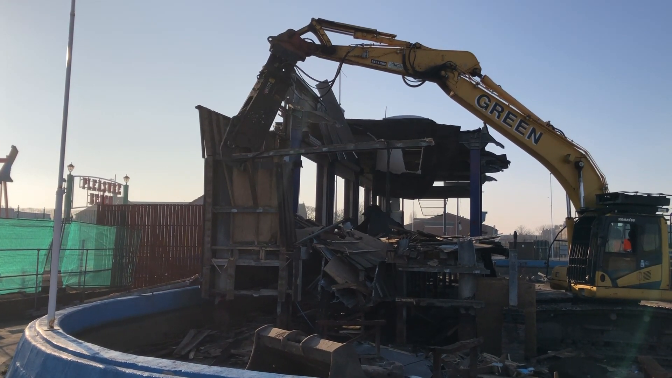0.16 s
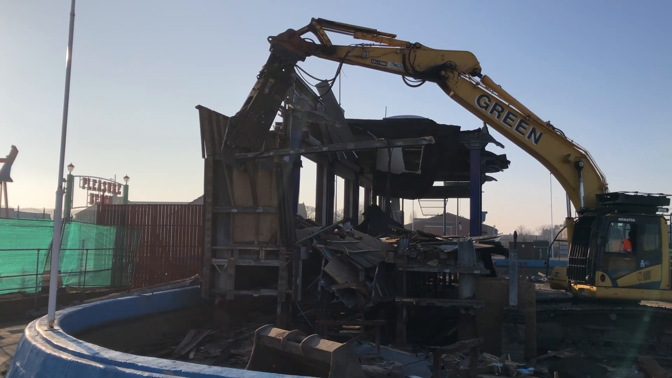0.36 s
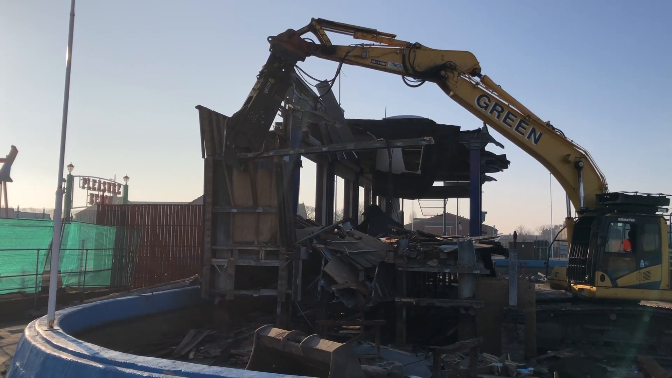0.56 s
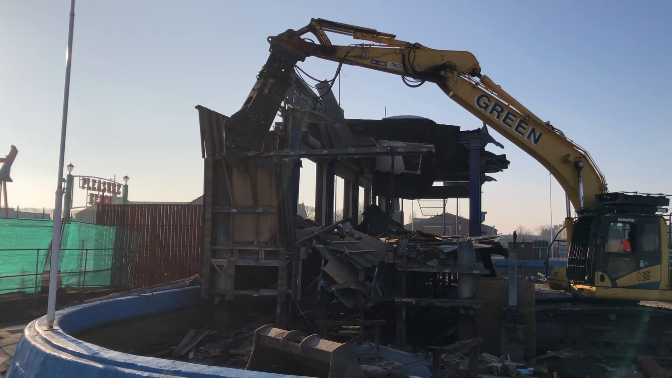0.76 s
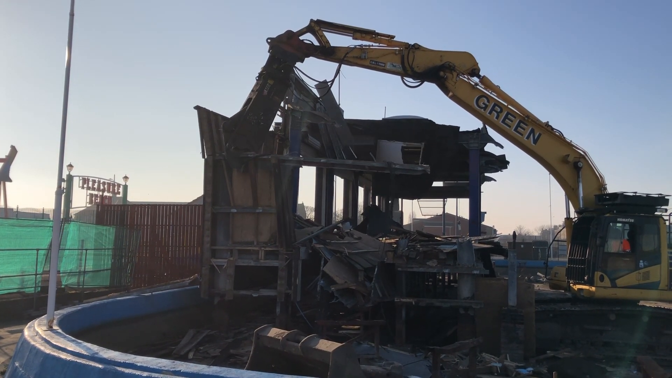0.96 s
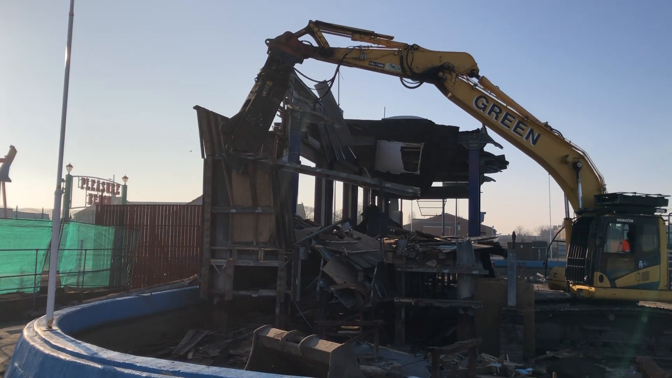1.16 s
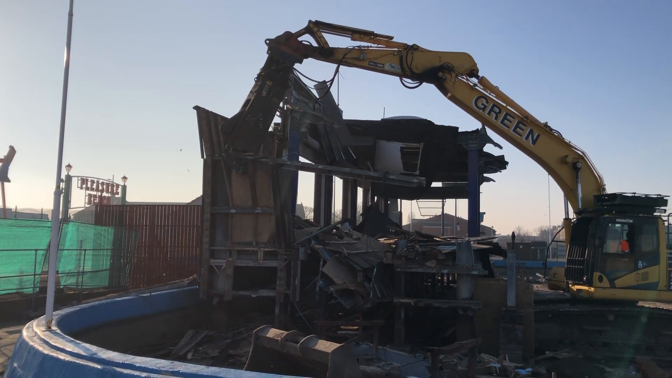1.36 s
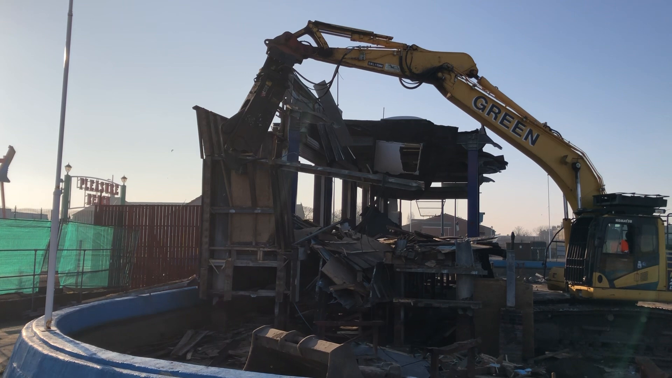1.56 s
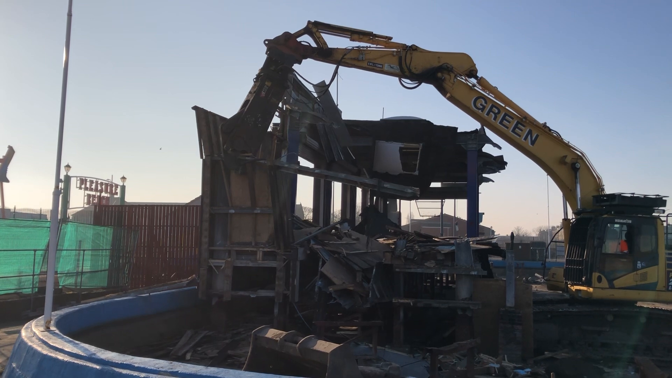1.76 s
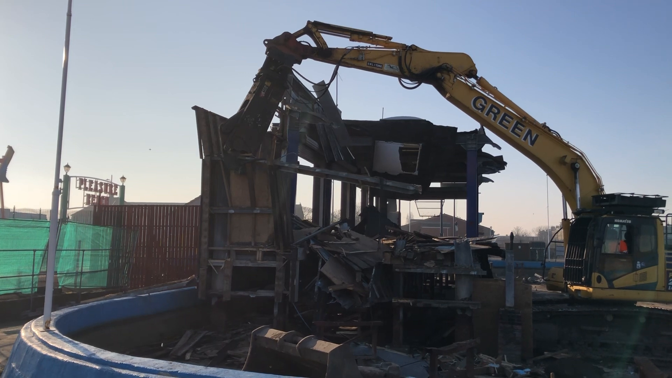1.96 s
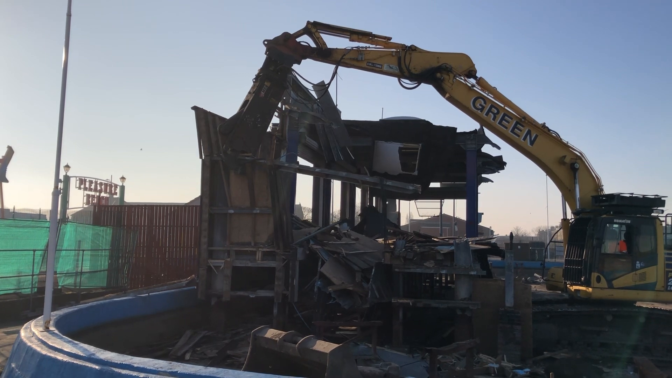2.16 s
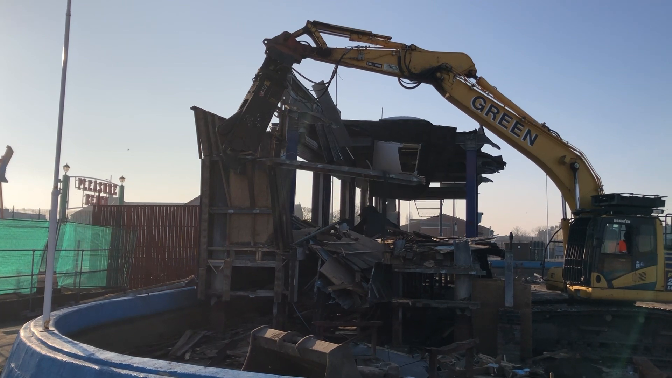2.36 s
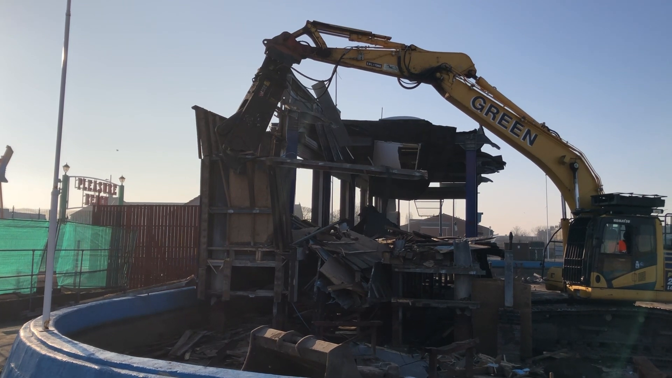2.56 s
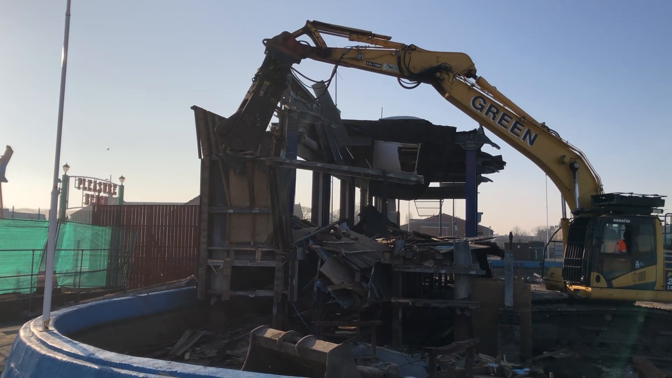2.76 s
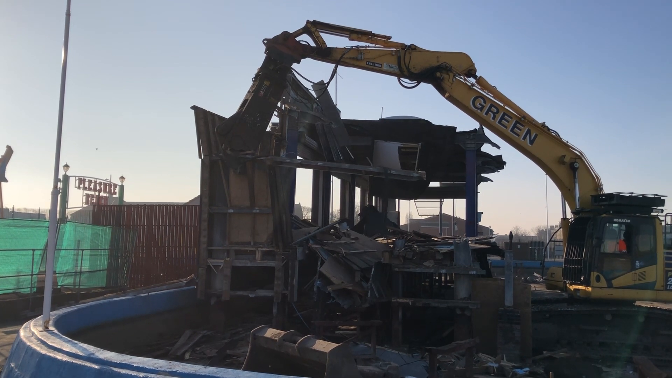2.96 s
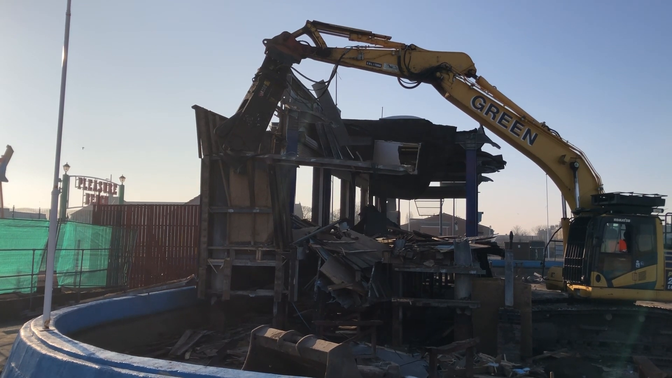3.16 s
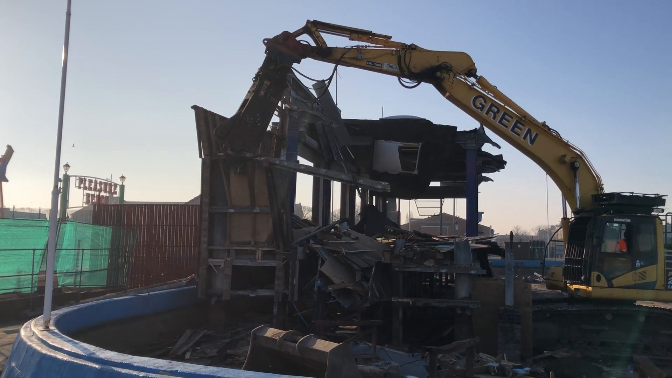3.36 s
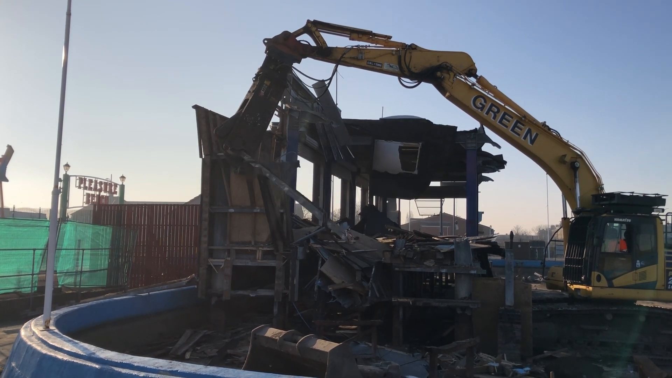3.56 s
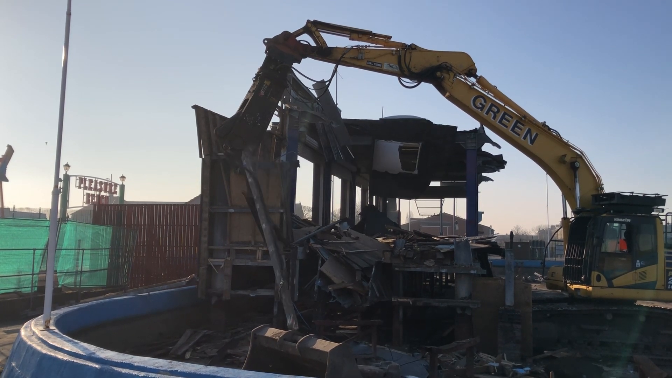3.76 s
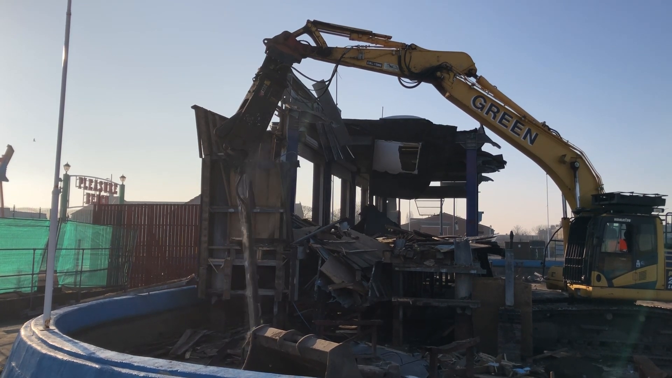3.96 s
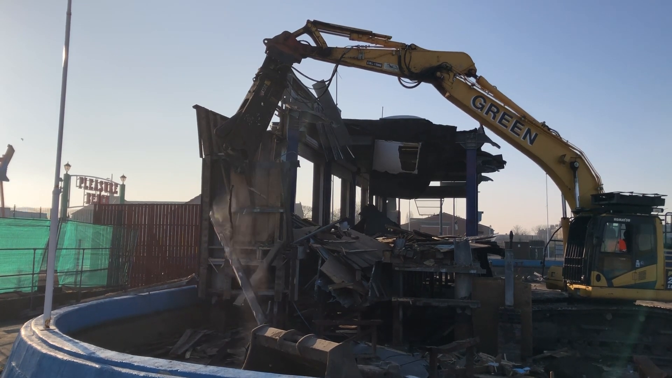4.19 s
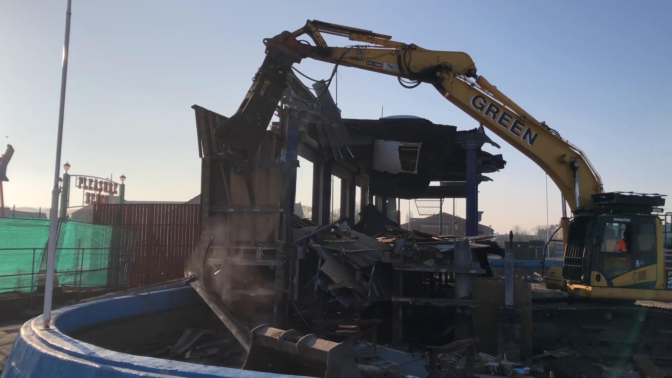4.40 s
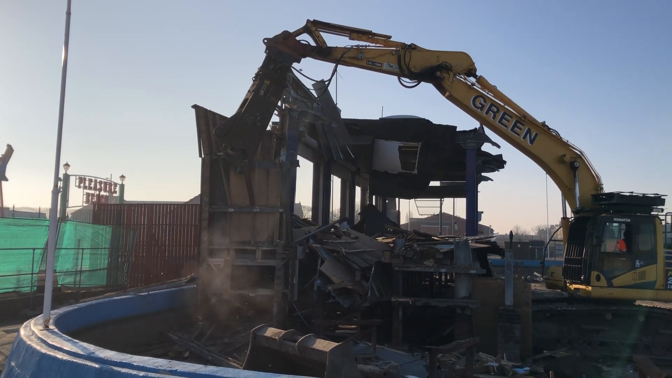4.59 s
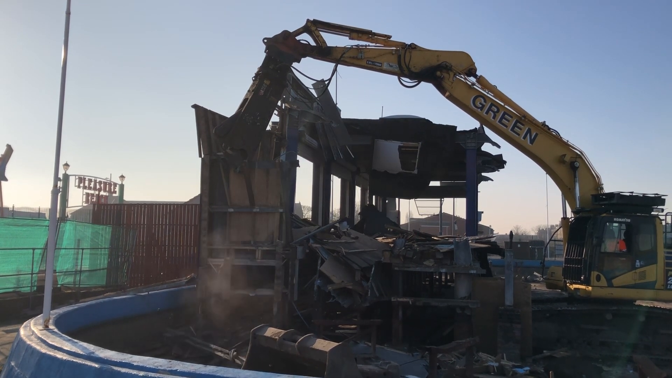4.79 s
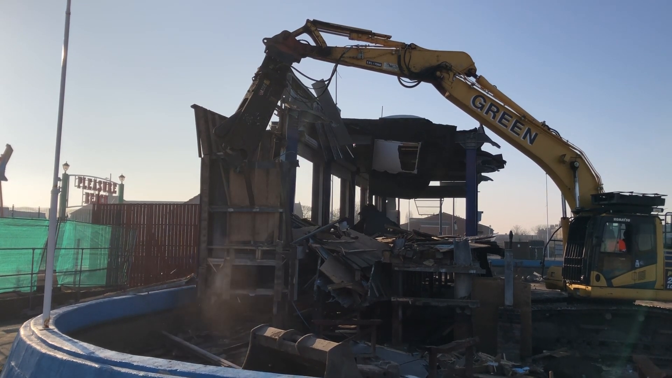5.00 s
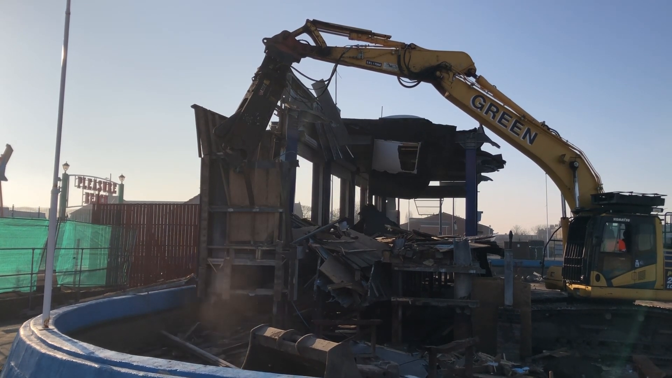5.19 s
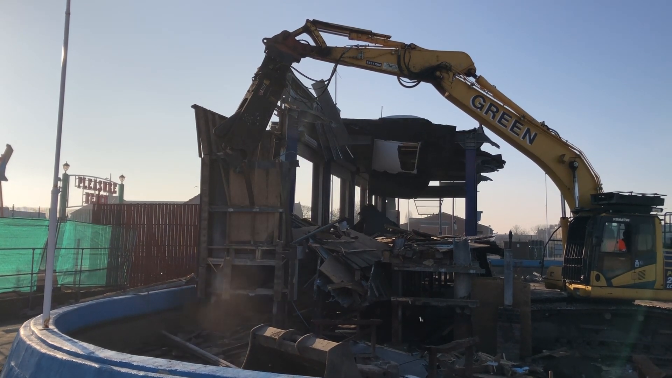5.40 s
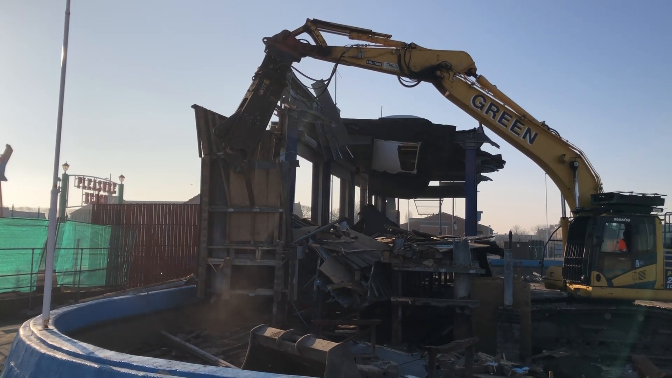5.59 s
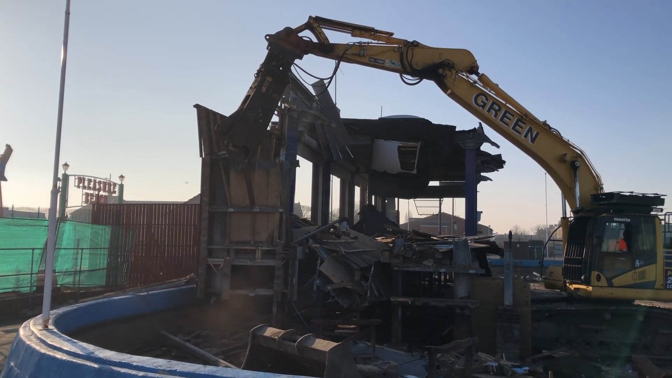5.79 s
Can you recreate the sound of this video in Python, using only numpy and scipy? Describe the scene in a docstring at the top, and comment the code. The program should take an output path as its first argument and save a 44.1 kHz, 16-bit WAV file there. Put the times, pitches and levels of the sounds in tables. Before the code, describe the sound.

Across an open demolition site, an idling excavator drones as metal snaps loudly, a beam crashes down against a wall, and debris settles.

```python
"""Grab tearing at a metal building

An excavator's grab tears at a metal building frame, heard from across the site, over diesel and pump hum.
Cladding crunches as volleys of tiny breaks filtered by resonances; chips, frame and wall ring in dying modes.
A beam lands against a wall that booms, and rubble tumbles in knocks that weaken on average.
Frequency-modulated tones make the engine, the pump and a faint electronic whine; ticks repeat throughout."""
import sys
import numpy as np
from scipy import signal
from scipy.fft import rfft, irfft, next_fast_len
from scipy.io import wavfile

SR = 44100
rng = np.random.default_rng(int(sys.argv[2]) if len(sys.argv) > 2 else 0)


def int16_out(signal):
    """Quantize to a 16-bit WAV file."""
    q = np.round(np.clip(np.atleast_2d(signal).T, -1, 1) * 32767)
    wavfile.write(sys.argv[1], SR, q.astype(np.int16))


N = 257540
TIME = np.arange(N) / SR  # s


def amp(db):
    """Logarithmic level: decibels become an amplitude ratio."""
    return 10 ** (np.asarray(db) / 20)


def unit(x):
    """Energy normalisation: scales a signal to rms 1."""
    return x / np.sqrt(np.mean(x ** 2) + 1e-20)


def read(points, hz):
    """Logarithmic pitch scale: interpolates a table along log frequency."""
    table_hz, value = np.transpose(points)
    return np.interp(np.log(hz + 1), np.log(table_hz + 1), value)


def add(mix, start_s, sound):
    """Superposition: sums a sound into the mix, in place, at a given time."""
    part = mix[max(round(start_s * SR), 0):][:len(sound)]
    part += sound[:len(part)]


def noise(spectrum):
    """Spectral shaping: white noise weighted to a given colour, at rms 1."""
    size = next_fast_len(N)
    white = rfft(rng.standard_normal(size))
    gain = amp(read(spectrum, np.fft.rfftfreq(size, 1 / SR)))
    return unit(irfft(white * gain, size)[:N])


def drift(per_s):
    """Slow random modulation: straight lines between per_s random values a second, at rms 1."""
    knots = rng.standard_normal(4096)
    return unit(np.interp(TIME * per_s, np.arange(len(knots)), knots))


def click(spectrum, peak_hz=1000, peak_db=0, octaves=0.19, size=4096):
    """Minimum phase: the causal impulse response of a given spectrum with one resonance on top."""
    hz = abs(np.fft.fftfreq(size, 1 / SR))
    distance = np.log2((hz + 1) / peak_hz) / octaves
    db = read(spectrum, hz) + peak_db / (1 + distance ** 2)
    log_gain = np.log(amp(np.maximum(db, -100)))
    # the Hilbert transform of the log gain supplies the minimum phase
    response = np.exp(np.conj(signal.hilbert(log_gain)))
    return np.fft.ifft(response).real[:size // 2]


def ring(modes, lift_db=0):
    """Modal decay: damped sines, tilted by lift_db per octave about the strongest mode."""
    t = TIME[:2 * SR]
    main_hz = max(modes, key=lambda mode: mode[1])[0]
    tone = np.zeros(len(t))
    for hz, db, t60 in modes:
        tilted_db = db + lift_db * np.log2(hz / main_hz)
        tone += amp(tilted_db - 60 * t / t60) * np.sin(2 * np.pi * hz * t)
    return tone


def breaks(size, per_s, spread_db):
    """Poisson-like crackle: impulses of random sign at random times, mostly small and a few large."""
    chance = rng.random(size)
    strength = rng.exponential(1, size)
    sign = rng.choice([-1, 1], size)
    return sign * amp(spread_db * np.minimum(strength, 3)) * (chance < per_s / SR)


def site(x, wet_db, gap=0.013, turn_s=0.5014, count=3):
    """Diffuse scattering: direct sound plus decaying echoes from walls and rubble, with shifting shares."""
    # echo decay of the site: (frequency [Hz], t60 [s])
    echo_decay = [(100, 1), (500, 0.73), (1400, 0.64), (3700, 0.55), (10000, 0.24)]
    wet = np.zeros(N)
    for k in range(count):
        # sparse echoes, silent for one gap and then fading in over another
        sparse = rng.standard_normal(SR) * (rng.random(SR) < 3000 / SR)
        taps = sparse * np.clip(TIME[:SR] / gap - 1, 0, 1)
        hz, t, z = signal.stft(taps, SR, nperseg=256)
        decay = amp(-60 * t / read(echo_decay, hz)[:, None])
        tail = signal.istft(z * decay, SR, nperseg=256)[1]
        share = np.cos(np.pi * (TIME / turn_s + k / count)) * np.sqrt(2 / count)
        wet += signal.fftconvolve(x * share, tail / np.linalg.norm(tail))[:N]
    return x + amp(wet_db) * wet


def machine(waver=0.00893, pump_waver=0.007, pump_db=-53.5):
    """Periodic sources: wavering diesel tones, clatter modulated by the firing, pump hum, rumble and hiss."""
    # noise colours of the running machine: (frequency [Hz], relative density [dB per Hz])
    rumble_colour = [(15, -52), (25, -29), (54, -5), (107, -4.5), (139, -8), (178, -7), (281, -7.5),
                     (316, -6), (355, -11), (461, -15), (532, -24), (560, -39.5), (730, -27), (1230, -120)]
    clatter_colour = [(310, -20), (520, -7.5), (583, -9), (626, -6), (676, -1.5), (735, 1.5), (955, 1),
                      (1290, -2), (1400, -8.5), (1510, -6.5), (2400, -28.5), (3120, -37), (5280, -120)]
    hiss_colour = [(1290, -37), (2200, 2.5), (2430, -2), (2680, -1.5), (3000, -5), (3260, -0.5),
                   (3770, -6.5), (4090, -3.5), (5490, -12), (7250, -13.5), (8540, -9), (9570, -19),
                   (15500, -23.5)]
    rumble_db, clatter_db, hiss_db = -49.5, -49.5, -69.5
    # engine tones before wavering: (frequency [Hz], level [dB])
    engine_tones = [(51, -70), (102, -70), (167, -64), (570, -75), (759, -69)]
    # the pump sags and recovers with the load: (time [s], mean frequency [Hz])
    pump_pitch = [(0, 314.4), (.3, 312), (.9, 319.3), (1.05, 312), (1.3, 332), (1.7, 315.3), (1.95, 327),
                  (2.45, 314.7), (2.7, 333.7), (3.1, 308.5), (3.5, 330), (3.85, 315.4), (4.55, 328.2),
                  (4.75, 305), (5.2, 299.8), (5.5, 308), (5.84, 294.2)]
    firing_depth = 0.12

    engine_s = np.cumsum(1 + waver * drift(7)) / SR  # time as the wavering engine counts it
    drone = np.zeros(N)
    for hz, db in engine_tones:
        level = amp(db + 4.7 * drift(7.3)) * np.sqrt(2)
        drone += level * np.sin(2 * np.pi * hz * engine_s)

    # the second engine tone is the firing rate
    firing = 1 + firing_depth * np.cos(2 * np.pi * engine_tones[1][0] * engine_s)
    clatter_level = amp(clatter_db + 0.15 * drift(2.3) + 0.2 * drift(57))
    clatter = clatter_level * firing * noise(clatter_colour)

    pump_hz = np.interp(TIME, *np.transpose(pump_pitch)) * (1 + pump_waver * drift(30.3))
    pump_turns = np.cumsum(pump_hz) / SR
    pump = amp(pump_db + 2.0 * drift(11)) * np.sqrt(2) * np.sin(2 * np.pi * pump_turns)

    rumble = amp(rumble_db) * noise(rumble_colour)
    hiss = amp(hiss_db) * noise(hiss_colour)
    return rumble + drone + clatter + pump + hiss


def electronics(whine_hz=8700, jitter_hz=70, whine_db=-82.5, tick_hz=7950, tick_s=0.0006, tick_at=.0318):
    """Frequency modulation: an unsteady high whine, and Gaussian-gated ticks of a wandering tone."""
    ticks_per_s, tick_db = 30, -69
    turns = np.cumsum(whine_hz + jitter_hz * (drift(590) + drift(14) / 2)) / SR
    whine = amp(whine_db + 2.1 * drift(140)) * np.sqrt(2) * np.sin(2 * np.pi * turns)
    # seconds from the nearest tick
    offset = (((TIME - tick_at) * ticks_per_s + .5) % 1 - .5) / ticks_per_s
    tone = np.sin(2 * np.pi * np.cumsum(tick_hz + 220 * drift(270)) / SR)
    gate = np.exp(-(offset / tick_s) ** 2 / 2)
    return whine + amp(tick_db + 2 * drift(22)) * gate * tone


# a piece of this strength [dB] has the stated thump and rebound; others depart from them
REFERENCE_DB = -20


def fractures(pieces, colour, levels_db, mode_ratio, peak_db, per_s, spread_db, rise, delay, linger,
              debris_db, debris_s, lead_db):
    """Source and filter: a leading break in a volley that swells, rebounds once and scatters debris."""
    # heavy pieces rebound more: growth in dB per dB of strength
    rebound_s, rebound_db, rebound_growth = 0.023, -7.5, 0.11
    out = np.zeros(N)
    t = TIME[:SR // 2] - TIME[SR // 32]  # starts ahead of the main break
    for (s, strength_db, _, hz, length), db in zip(pieces, levels_db):
        fall = max(length * linger, .002)
        first, second = (np.exp(-(u / np.where(u < 0, rise, fall)) ** 2) for u in (t, t - rebound_s))
        second_db = rebound_db + rebound_growth * (strength_db - REFERENCE_DB)
        swell = np.hypot(first, amp(second_db) * second)
        push = swell * breaks(len(t), per_s, spread_db)
        push += amp(lead_db) * np.linalg.norm(push) * (t == 0)
        scatter = breaks(len(t), per_s / 20, spread_db)
        debris = amp(debris_db) * (t > 0) * np.exp(-t / debris_s) * scatter
        piece = click(colour, hz * mode_ratio, peak_db)  # every piece has a resonance of its own
        volley = signal.fftconvolve(push + debris, piece)
        gain = amp(db) * np.linalg.norm(swell) / (np.linalg.norm(volley) + 1e-9)
        add(out, s + t[0] + delay, gain * volley)
    return out


def crunches(pieces, thump_db, wet_db, debris_db, rise_s, lead_db):
    """Band-wise fracture: a hollow body, bright splinters and a low thump that grows with the strength."""
    # colours of a crunch: (frequency [Hz], relative density [dB per Hz])
    body_colour = [(200, -54.5), (400, -16.5), (520, -21.5), (600, -10), (680, -6), (760, 0), (900, -7),
                   (1050, -5), (1150, -3.5), (1380, -9.5), (1550, -8.5), (1740, -21.5), (1950, -31),
                   (2150, -29), (2700, -48), (4600, -100)]
    splinter_colour = [(1120, -36), (1900, -13.5), (2260, 3.5), (2950, -7), (3360, -5), (4150, -9),
                       (4910, -16), (6160, -15.5), (7030, -22.5), (8020, -24.5), (9230, -31),
                       (10200, -29.5), (15500, -48)]
    thump_colour = [(59, -35), (100, -5), (243, -4), (285, 0.5), (312, -0.5), (381, -5), (520, -20),
                    (680, -63), (1140, -120)]
    thump_growth = 0.87  # dB per dB of strength
    _, db, bright_db, *_ = np.transpose(pieces)
    body = fractures(
        pieces, body_colour, db - 9.0, mode_ratio=0.97, peak_db=4.5, per_s=3000, spread_db=3,
        rise=rise_s, delay=0.001027, linger=1.29, debris_db=debris_db, debris_s=0.16, lead_db=lead_db)
    splinters = fractures(
        pieces, splinter_colour, db + bright_db - 4.5, mode_ratio=2.6, peak_db=3.0, per_s=3400, spread_db=4.0,
        rise=rise_s, delay=0.001, linger=1.3, debris_db=-0.5, debris_s=0.083, lead_db=-22.5)
    thump_levels_db = thump_db + thump_growth * (db - REFERENCE_DB)
    thump = fractures(
        pieces, thump_colour, thump_levels_db, mode_ratio=0.36, peak_db=2.5, per_s=1300, spread_db=2.5,
        rise=0.0077, delay=0.00601, linger=1.28, debris_db=-20.5, debris_s=.1, lead_db=-11)
    return site(body + thump, wet_db) + site(splinters, wet_db=-11.0)


def snaps(gain_db=0, ring_db=10, octaves=0.11):
    """Resonant excitation: a few milliseconds of noise make each brittle chip ring at its own pitch."""
    # chips that snap off: (time [s], level [dB], ring frequency [Hz], decay time [s])
    chips = [(0.654, -49, 2380, 0.0035), (0.956, -44, 3550, 0.0051), (1.077, -47, 2320, 0.007),
             (2.275, -42.5, 2400, .004), (3.195, -19, 1590, 0.0061), (3.196, -37, 2650, 0.016),
             (3.317, -51, 6260, 0.013), (4.663, -46, 8010, 0.017), (5.147, -57.5, 3320, 0.013),
             (5.469, -51, 2320, 0.0056)]
    out, t = np.zeros(N), TIME[:4096]
    for s, db, hz, length in chips:
        colour = [(hz / 8, -40), (hz / 2, -3), (hz, 0), (hz * 2, -18), (hz * 8, -60)]
        fade = np.exp(-t / length) * (1 - np.exp(-t / .001))
        crackle = rng.standard_normal(len(t)) * fade
        chip = signal.fftconvolve(crackle, click(colour, hz, ring_db, octaves))
        add(out, s, amp(db + gain_db) * chip * np.linalg.norm(fade) / np.linalg.norm(chip))
    return out


def cracks(rattle_db=-22, rattle_s=0.016):
    """Impulsive release: one sharp pulse as a fastening gives way, and a brief rattle of the parted pieces."""
    # dry cracks: (time [s], level [dB])
    releases = [(0.7382, -21)]
    # their colour: (frequency [Hz], relative density [dB per Hz])
    crack_colour = [(300, -42), (500, -14), (740, 1), (1470, 3), (1930, -15), (2350, -1), (2850, -21),
                    (3700, -16), (4600, -31), (7000, -41), (13000, -87)]
    out, pulse, t = np.zeros(N), click(crack_colour), TIME[:2048]
    push = amp(rattle_db) * rng.standard_normal(len(t)) * np.exp(-t / rattle_s) / 2
    push[0] = 1
    for s, db in releases:
        add(out, s, amp(db) * signal.fftconvolve(push, pulse / abs(pulse).max()))
    return site(out, wet_db=-10.5)


def clanks(gain_db=-6, rise=0.022):
    """Modal excitation: the steel frame rings in its own modes when the grab jolts it."""
    # knocks on the frame: (time [s], relative level [dB])
    knocks = [(0.79, -42.5), (1.03, -36), (1.794, -44), (2.291, -46), (3.205, -28), (3.309, -32.5)]
    # modes of the frame: (frequency [Hz], relative level [dB], t60 [s])
    frame_modes = [(213.5, -1, 0.86), (304.8, 16.5, 0.28), (410, -12, 0.059), (500, -2.5, 0.5),
                   (760, -6, 0.49), (940, -48, .5), (1075, 8, 0.2), (1270, -18, 0.89), (1400, -6, 0.12),
                   (2420, -47, .4)]
    out, tone = np.zeros(N), ring(frame_modes)
    tone = tone * (1 - np.exp(-TIME[:len(tone)] / rise))
    for s, db in knocks:
        add(out, s, amp(db + gain_db) * tone)
    return out


def grit(per_s=700, spread_db=4):
    """Granular flow: many tiny impacts of crumbs and flakes trickling from the torn cladding."""
    # spills of fine grit: (time of thickest flow [s], level [dB], spread [s])
    spills = [(.97, -63.5, 0.33), (2.35, -62, 0.036), (2.49, -65.5, 0.086), (3.048, -66, 0.083)]
    # their colour: (frequency [Hz], relative density [dB per Hz])
    grit_colour = [(500, -51), (1800, 5), (2400, 3), (3600, 2.5), (5000, -4), (7000, -5.5), (9000, -13),
                   (12000, -16), (15500, -26)]
    flow = sum(amp(db) * np.exp(-((TIME - s) / spread) ** 2) for s, db, spread in spills)
    grains = signal.fftconvolve(breaks(N, per_s, spread_db), click(grit_colour))[:N]
    return site(flow * unit(grains), wet_db=-7.5)


def booms(rise=0.018, rubble_db=-5, rubble_s=0.78):
    """Low modal response: the wall wobbles on its lowest modes while the rubble under it rumbles."""
    # blows on the wall: (time [s], relative level [dB], lift of the upper modes [dB per octave])
    blows = [(3.222, -43, 11), (4.02, -37, 6.5), (4.10, -37.5, 15), (4.342, -37, -3), (4.717, -37, 9),
             (5.389, -50, -10)]
    # modes of the wall: (frequency [Hz], relative level [dB], t60 [s])
    wall_modes = [(43.04, -16.5, 9), (55.15, 1, 1.75), (64.9, -19, 0.61), (92, 1, 0.76)]
    # colour of the rubble: (frequency [Hz], relative density [dB per Hz])
    rubble_colour = [(15, -43), (28, -18), (40, 10), (90, 10.5), (125, -9), (200, -41), (500, -68)]
    out, shake_power, t = np.zeros(N), np.zeros(N), TIME[:2 * SR]
    onset = 1 - np.exp(-t / rise)
    for s, db, lift_db in blows:
        add(out, s, amp(db) * onset * ring(wall_modes, lift_db))
        shake = amp(db + rubble_db) * onset * np.exp(-t / rubble_s)
        add(shake_power, s, shake ** 2)  # overlapping rumbles add in power
    return out + np.sqrt(shake_power) * noise(rubble_colour)


def tumble(count=24, spread_db=2, spread_octaves=0.22):
    """Energy loss in a settling heap: rows for uneven knocks of rubble, weaker on average with time."""
    from_s, per_s, start_db, fade_db_per_s = 4.18, 20, -26, 13
    splinter_db, middle_hz, length_s = -30.5, 1050, 0.02
    late, size, pitch = rng.uniform(-1, 1, (count, 3)).T
    age = (np.arange(count) + late / 2) / per_s
    db = start_db - fade_db_per_s * age + spread_db * size
    hz = middle_hz * 2 ** (spread_octaves * pitch)
    return [(from_s + a, d, splinter_db, f, length_s) for a, d, f in zip(age, db, hz)]


def scene():
    """Superposition at the listener: tearing starts abruptly, falling pieces land more gradually."""
    # cladding gives way under the grab; then the beam and loose pieces land:
    # (time [s], strength [dB], splinters against body [dB], reference pitch [Hz], reference length [s])
    tears = [(.6, -33.5, -34, 600, 0.019), (.769, -22, -22, 1370, 0.024), (.852, -31.5, -19, 1010, 0.028),
             (.956, -24.5, -25, 864, 0.026), (1.017, -21.5, -31, 780, 0.018),
             (1.077, -23.5, -20.5, 870, 0.022), (2.148, -32, -24, 1040, .015),
             (2.233, -32.5, -23.5, 1080, 0.025), (2.281, -29.5, -23, 1160, 0.016),
             (2.344, -36, -15.5, 940, 0.029), (3.196, -8, -26.5, 544, 0.015),
             (3.318, -22.5, -22.5, 1060, 0.03)]
    falls = [(3.692, -24.5, -33.5, 1068, 0.034), (3.822, -29.5, -28, 1050, 0.024),
             (4.011, -8, -30, 894, 0.019), (4.082, -10.5, -32.5, 1000, 0.0097),
             (4.141, -18.5, -26.5, 1050, 0.018), (4.272, -19, -32.5, 1001, 0.024),
             (4.598, -29.5, -23.5, 1040, 0.043), (4.66, -7.5, -25.5, 985, .026),
             (4.748, -19, -24, 1040, 0.018), (5.081, -24.5, -35, 1000, 0.037),
             (5.195, -30, -27, 881, 0.026), (5.469, -34.5, -29, 1200, 0.023),
             (5.815, -28.5, -31, 927, 0.013)]
    tearing = crunches(tears, thump_db=-39.5, wet_db=-7.5, debris_db=-11, rise_s=0.0047, lead_db=-11)
    landing = list(falls) + tumble()
    falling = crunches(landing, thump_db=-45.5, wet_db=-11.5, debris_db=-13, rise_s=0.0096, lead_db=-15.5)
    chips = site(snaps(), wet_db=-12.5)
    steady = machine() + electronics()
    return (steady + tearing + falling + chips + cracks() + clanks() + grit() + booms())[None]


def record(dry):
    """Band limiting: a linear-phase low-pass filter removes the highest treble."""
    edge_hz = 15700
    low_pass = signal.firwin(511, edge_hz, window=("kaiser", 9), fs=SR)
    return signal.oaconvolve(dry, low_pass[None], "same")


dry = scene()
out = record(dry)
int16_out(out)
```